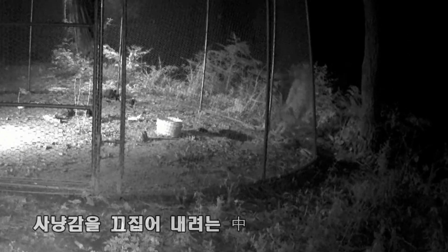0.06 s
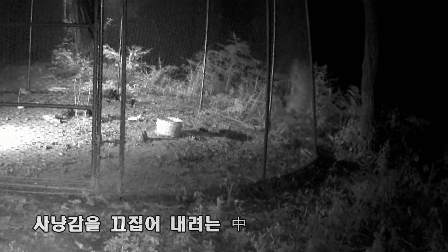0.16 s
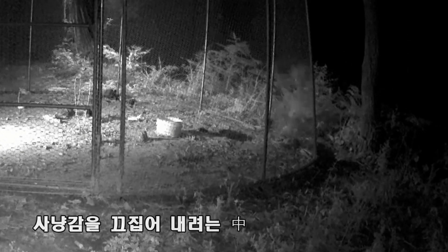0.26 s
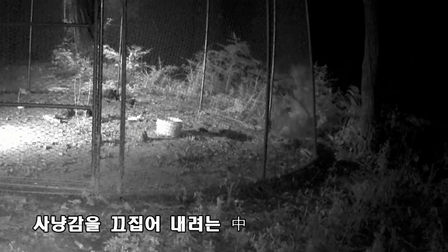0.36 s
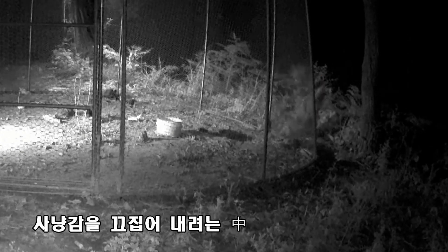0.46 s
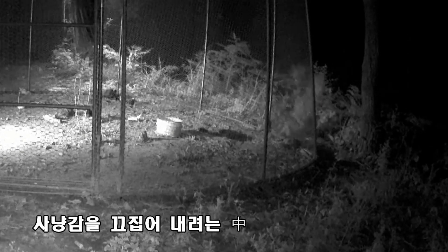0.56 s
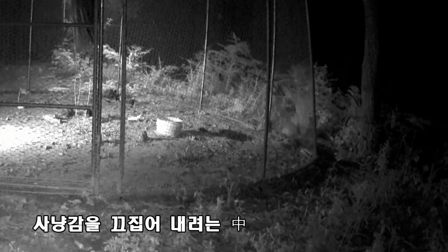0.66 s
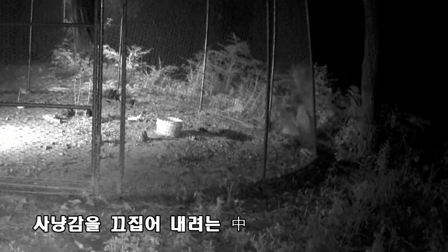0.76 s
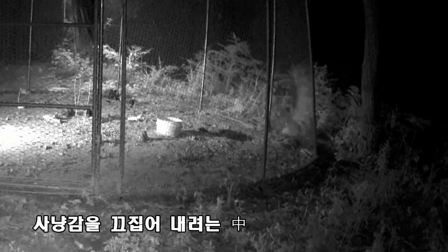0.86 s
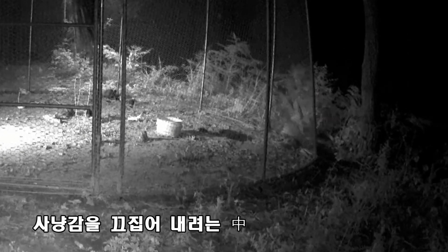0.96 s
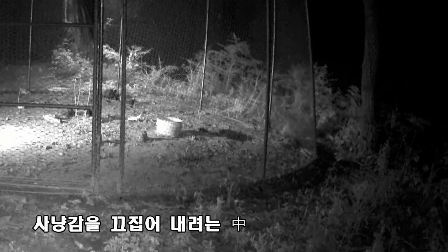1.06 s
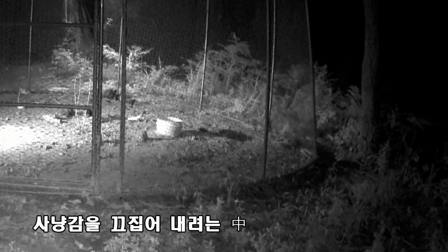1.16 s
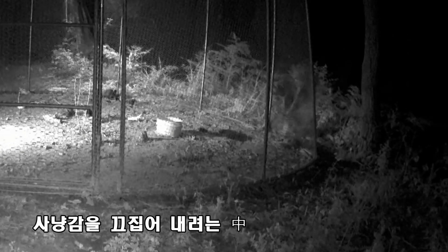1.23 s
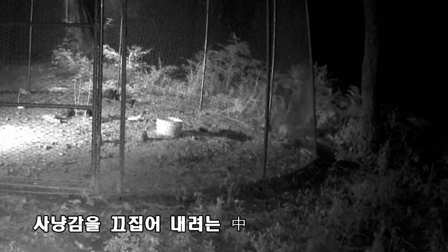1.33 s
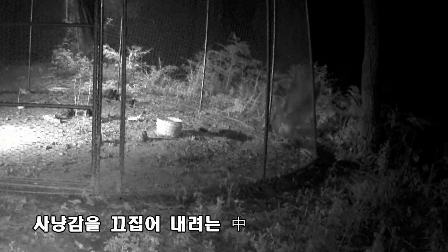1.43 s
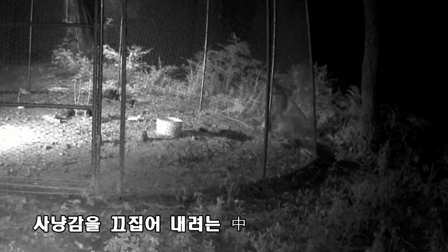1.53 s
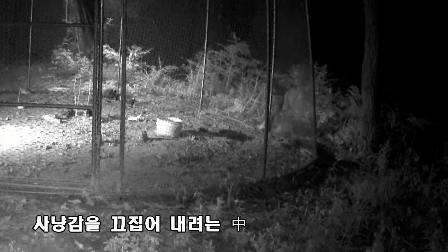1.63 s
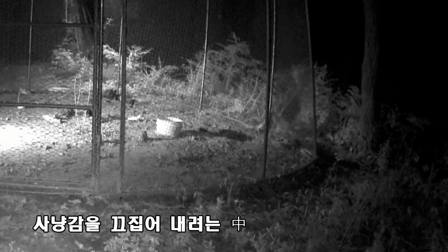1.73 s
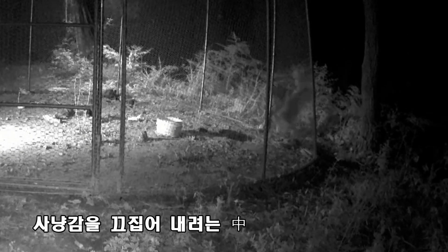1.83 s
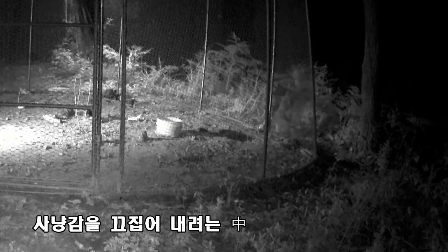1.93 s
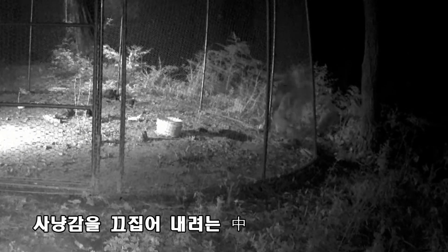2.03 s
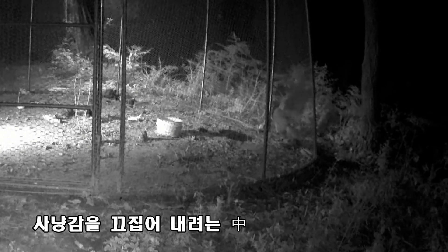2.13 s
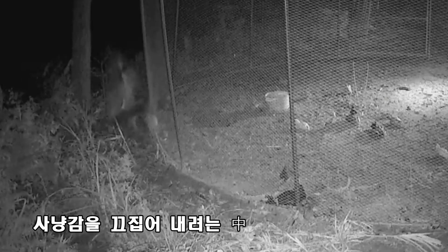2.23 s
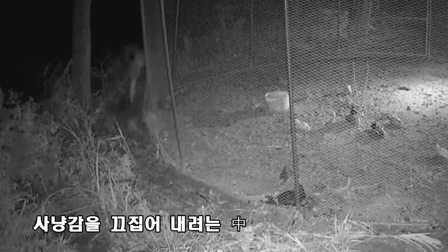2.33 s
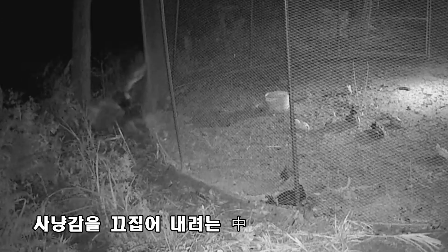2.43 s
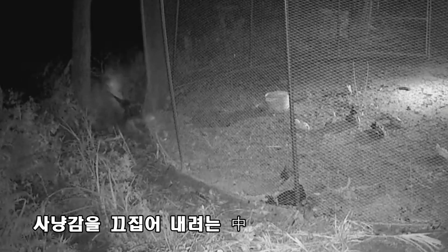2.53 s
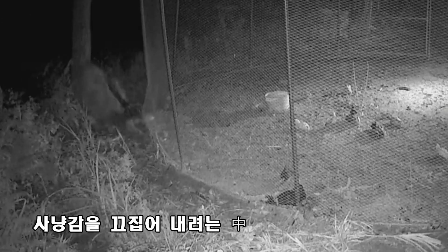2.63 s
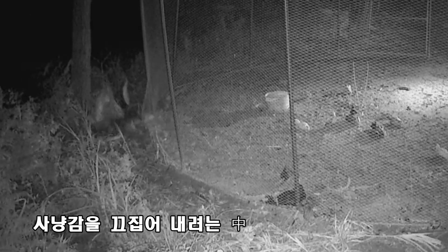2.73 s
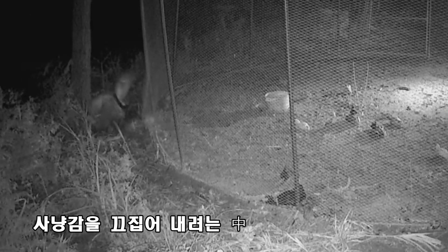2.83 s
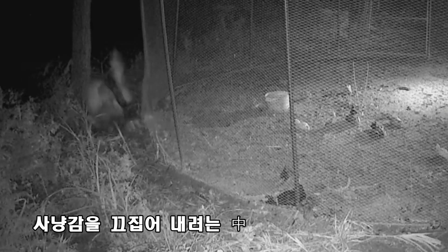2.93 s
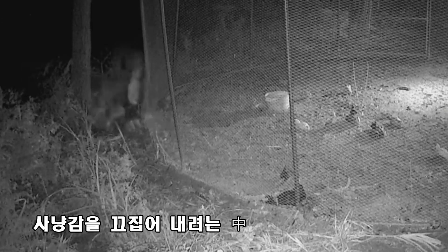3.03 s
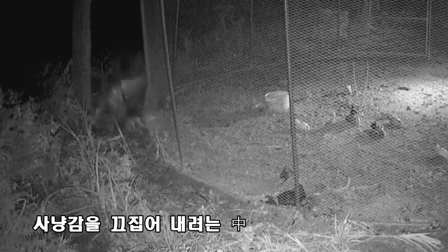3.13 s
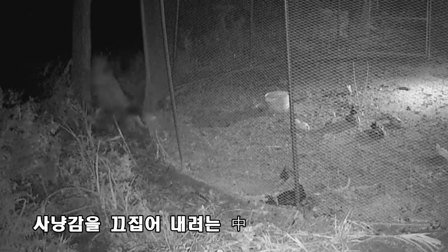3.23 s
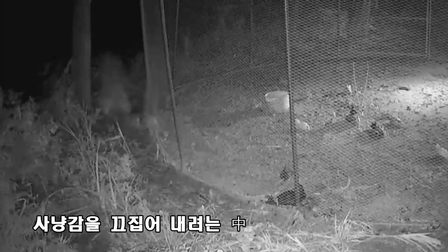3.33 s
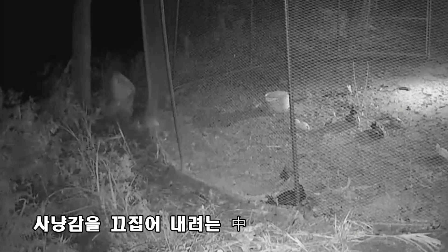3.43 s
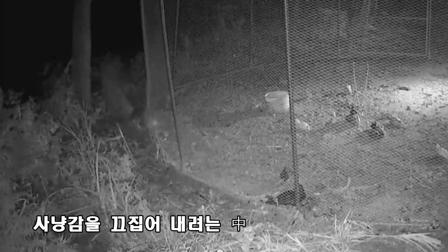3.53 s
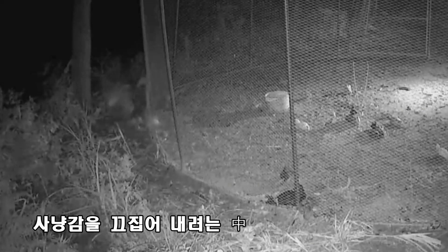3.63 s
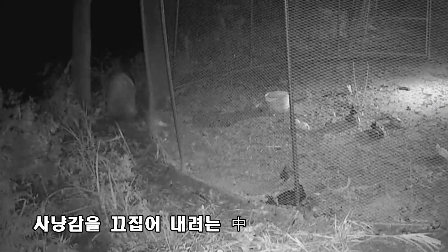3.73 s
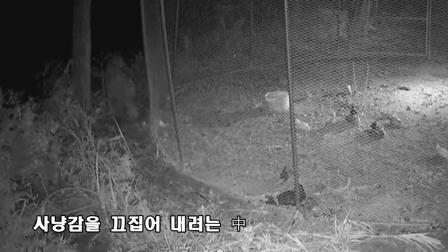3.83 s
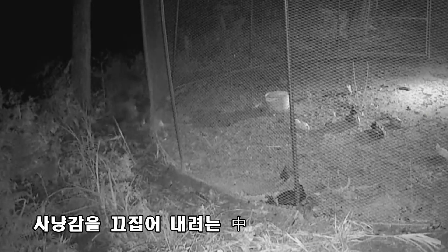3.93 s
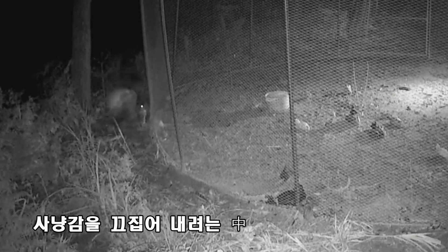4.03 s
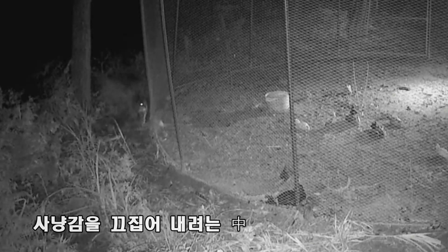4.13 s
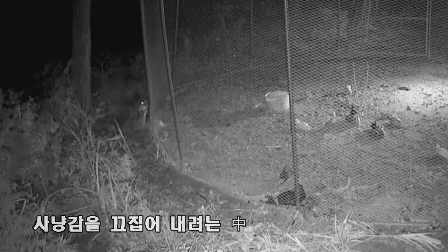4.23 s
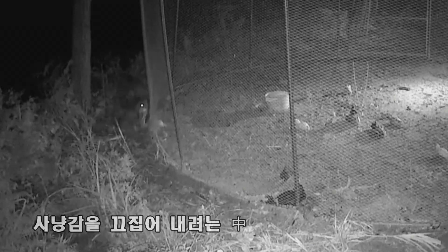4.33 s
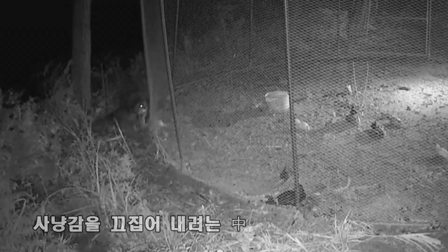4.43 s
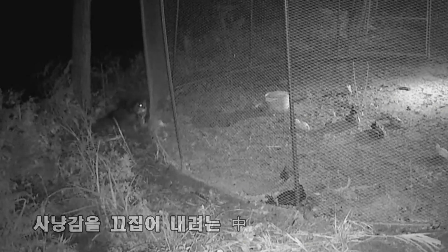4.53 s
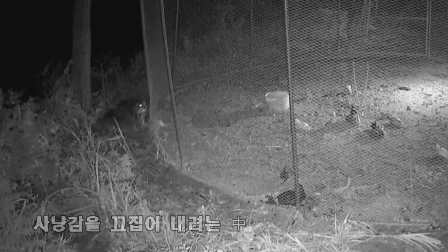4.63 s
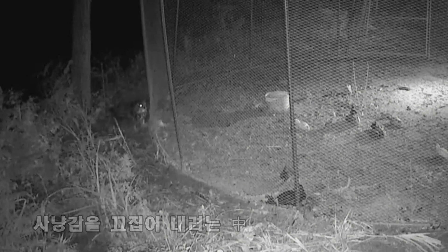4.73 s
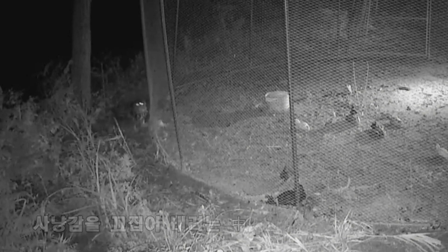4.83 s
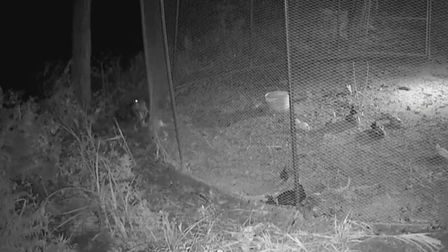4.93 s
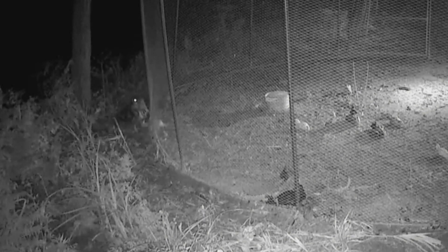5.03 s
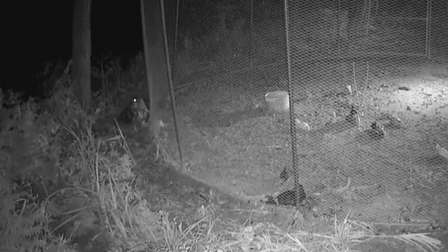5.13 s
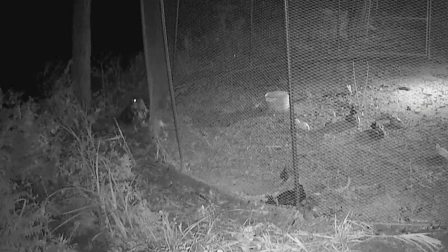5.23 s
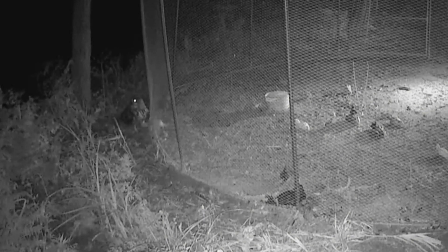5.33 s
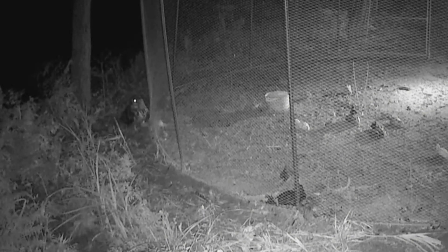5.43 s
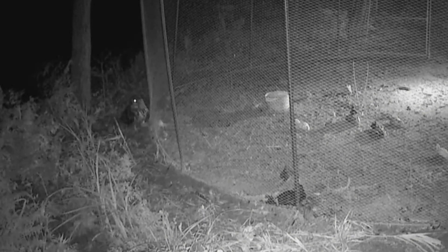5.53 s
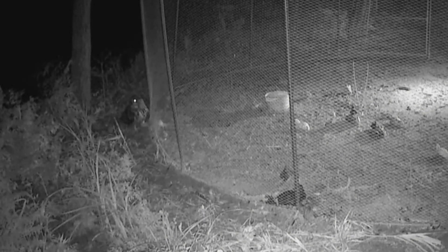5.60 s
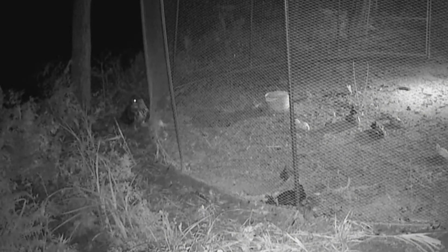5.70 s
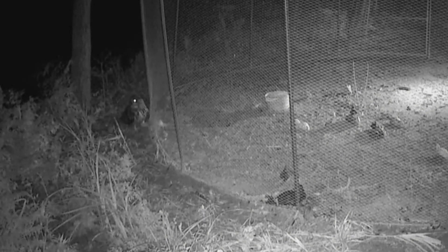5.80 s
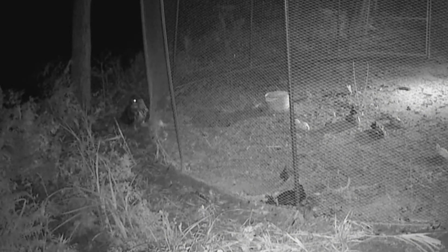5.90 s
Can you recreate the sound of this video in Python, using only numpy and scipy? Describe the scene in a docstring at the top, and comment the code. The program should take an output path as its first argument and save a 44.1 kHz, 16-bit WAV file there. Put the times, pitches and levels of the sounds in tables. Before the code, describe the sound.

Crickets trill at night while an animal twice rattles and thumps a wire fence, then a far dog yelps once.

```python
"""A wire-mesh fence clashes as an animal throws itself at a poultry pen at night. Each blow slams hundreds of
wire crossings together, the mesh shivers on, the posts boom and a taut wire squeals as it swings back. Three
kinds of cricket call with their wings over a faint rumble and insect hiss. The bout plays twice. Near the end a
far dog yelps once and trails off in a whine that rings in the woods, then a faint higher tone follows.
Everything sits in the left channel."""
import sys
import numpy as np
from scipy import signal
from scipy.fft import rfft, irfft
from scipy.io import wavfile

SR = 44100
rng = np.random.default_rng(int(sys.argv[2]) if len(sys.argv) > 2 else 0)


def to_wav(sig):
    """Store sig (one row per channel, or 1-D mono) as 16-bit WAV at the path in sys.argv[1].

    Samples outside -1..1 are clipped; the rate is SR.
    """
    pcm = np.clip(np.atleast_2d(sig), -1, 1) * 32767
    pcm = np.round(pcm).astype(np.int16)
    wavfile.write(sys.argv[1], SR, pcm.T)  # frames by channels


N = 262836
T = np.arange(N) / SR


def undb(db):
    """Decibels to gain."""
    return 10 ** (np.asarray(db) / 20)


def unit(x):
    """Scale to rms 1."""
    return x / np.sqrt(np.mean(x ** 2) + 1e-20)


def eq_db(eq, hz):
    """Level of an EQ curve at the given frequencies."""
    rows = np.array(eq)
    return np.interp(np.log(hz + 0.00091), np.log(rows[:, 0]), rows[:, 1])


def colour(x, eq):
    """Filter through an EQ curve; rms 1."""
    hz = np.arange(len(x) // 2 + 1) * SR / len(x)
    return unit(irfft(rfft(x) * undb(eq_db(eq, hz)), len(x)))


def noise(size, eq):
    """Coloured noise at rms 1."""
    return colour(rng.standard_normal(size), eq)


def drift(rate_hz):
    """Random modulator with a spread near 1."""
    knots = rng.standard_normal(4096)
    return 1.2 * np.interp(T * rate_hz, np.arange(len(knots)), knots)


def add(out, start, x):
    """Mix x in at a start time in seconds."""
    i = int(start * SR)
    out[i:i + len(x)] += x[:max(N - i, 0)]


def resonate(x, modes):
    """Parallel bank of two-pole resonators, each at least 15 Hz wide."""
    return sum(undb(db) * signal.lfilter(*signal.iirpeak(hz, hz / max(width, 15), SR), x)
               for hz, width, db in modes)


def woods(x, t60):
    """Reverb of sound scattered back by many trunks."""
    tail = rng.standard_normal(SR) * undb(-60 * T[:SR] / t60)
    return signal.fftconvolve(x, tail / np.linalg.norm(tail))[:N]


# ring of the short wire spans (frequency [Hz], width [Hz], level [dB])
SPAN_MODES = [(1440, 13, -7), (1800, 37, -15), (1970, 19, -10), (2194, 16, 4), (2630, 23, 0),
              (3210, 150, -7.5), (3820, 63, -6), (4070, 29, -10), (5200, 51, -10.5), (5080, 46, -6),
              (6370, 140, 3.5), (7010, 58, 5.5)]


def wire_contacts(size, spread_db, ring_db):
    """Dense clicks of very unequal strength, each ringing the spans of the mesh."""
    clicks = rng.standard_normal(size)
    clicks *= undb(spread_db * np.repeat(rng.standard_normal(size // 8 + 1), 8)[:size])
    return clicks + undb(ring_db) * resonate(clicks, SPAN_MODES)


# hits on the mesh (time [s], level [dB], attack [s], length [s], rattle [dB], belly [dB], tilt [dB/octave])
MESH_HITS = [(2.395, -28, 0.001, 0.016, -11.5, -27.5, 0), (2.644, -39, 0.0013, 0.002, -14, -17, 3.5),
             (2.701, -47.5, 0.013, .02, -17, -31, -2.5), (2.903, -23, 0.016, .021, -5, -19.5, 0),
             (3.204, -35, 0.012, 0.0082, -29, -10, 2.5), (3.258, -24.3, 0.018, .031, -6, -21, 0.5),
             (3.602, -24, 0.015, 0.026, -11, -20.5, -0.64), (3.759, -44, 0.017, .028, 0.5, -1, -2.5),
             (3.856, -35.5, .0016, 0.0047, -6, -17, 3), (4.054, -45.5, .006, 0.026, -18, -24, 7.5),
             (4.126, -38, 0.0018, 0.017, -8, -14.5, -0.4), (4.237, -44, 0.011, 0.054, -15, -23, 4.5)]
# bright crash of the crossings (frequency [Hz], level [dB])
CLASH_EQ = [(290, -36.5), (500, -17), (659, -13.5), (831, -2), (1060, -3.5), (1160, -1), (1380, -2),
            (1740, -1.5), (2810, -2.5), (4150, -0.5), (11500, -6.5), (14700, -19), (16000, -29)]
# the panel's own ring (frequency [Hz], width [Hz], level [dB])
PANEL_MODES = [(1516, 210, -5.5), (1783, 230, -0.5), (1970, 130, -3), (2410, 190, -10)]
# low body of the slack sheet (frequency [Hz], level [dB])
BELLY_EQ = [(60, -21), (150, -9), (250, -3), (450, 3.5), (580, 1), (720, -30), (1200, -44)]


def blows(stop_t60=0.049, rattle_t60=0.29, belly_lag_s=0.00847):
    """The crossings clash under the push, then rattle out; slow bending waves bring the lows late."""
    out, t = np.zeros(N), np.arange(16384) / SR
    for start, db, attack, length, rattle_db, belly_db, tilt in MESH_HITS:
        since_push = np.maximum(t - length, 0)
        push = np.minimum(0.28 + t / attack, 1) * undb(-60 * since_push / stop_t60)
        rattle = np.minimum(t / length, 1) * undb(rattle_db - 60 * since_push / rattle_t60)
        force = undb(db) * np.maximum(push, rattle)
        tilted_eq = [(hz, level + tilt * np.log2(hz / 4000)) for hz, level in CLASH_EQ]
        clash = colour(wire_contacts(len(t), spread_db=3, ring_db=-11), tilted_eq)
        clang_db = -8.5 - 2 * tilt  # square, dull blows ring the panel; glancing, bright ones hardly do
        clang = undb(clang_db) * unit(resonate(rng.standard_normal(len(t)), PANEL_MODES))
        add(out, start, force * unit(clash + clang))
        add(out, start + belly_lag_s, undb(belly_db) * force * noise(len(t), BELLY_EQ))
    return out


def sway(crest, build, t60, linger_db=-13, linger_t60=2.7):
    """Envelope of one sway: it builds to a crest, settles and leaves the fence trembling faintly."""
    before, after = np.maximum(crest - T, 0), np.maximum(T - crest, 0)
    settle = np.maximum(undb(-60 * after / t60), undb(linger_db - 60 * after / linger_t60))
    return np.exp(-(before / build) ** 2) * settle


# swings of the mesh (crest time [s], level [dB], build-up [s], t60 [s], chatter against jingle [dB])
MESH_SWAYS = [(2.45, -47.5, 0.022, 0.75, -5.5), (2.632, -45.5, 0.15, 0.64, -1.5),
              (3.27, -50, 0.082, 1.86, -2.5), (3.61, -49, .16, 3.2, -10), (3.885, -49, 0.077, 0.62, -4.5),
              (4.16, -50, 0.13, 1.29, -15), (4.31, -52, 0.057, 0.94, -10)]
# fine, sparkling contacts (frequency [Hz], level [dB])
JINGLE_EQ = [(1000, -9.5), (2500, -8.5), (4300, 0.5), (6500, -2.5), (9000, 2.5), (12000, -3), (16000, -19)]
# coarse, midrange contacts (frequency [Hz], level [dB])
CHATTER_EQ = [(80, -21), (200, -4.5), (450, -9), (700, -16.5), (1050, -2), (1500, -1), (2000, -3),
              (2700, -3), (3600, -4.5), (7000, -13.5)]


def shiver():
    """The swaying mesh keeps jingling and chattering in small flurries; the sways add in power."""
    jingle_power, chatter_power = np.zeros(N), np.zeros(N)
    for crest, db, build, t60, chatter_db in MESH_SWAYS:
        motion = undb(db) * sway(crest, build, t60)
        jingle_power += motion ** 2
        chatter_power += (undb(chatter_db) * motion) ** 2
    flurry = undb(1.78 * drift(70))
    jingle = colour(wire_contacts(N, spread_db=2, ring_db=-8), JINGLE_EQ) * np.sqrt(jingle_power)
    chatter = colour(wire_contacts(N, spread_db=2.5, ring_db=3), CHATTER_EQ) * np.sqrt(chatter_power)
    return flurry * (jingle + chatter) * (T > MESH_HITS[0][0])


# distant rumble (frequency [Hz], level [dB])
RUMBLE_EQ = [(25, -9), (42, -2), (62, -13), (100, 4.5), (125, -7), (165, -16.5), (340, -6.5), (480, -16.5),
             (570, -10), (660, -17.5), (1020, -12), (2400, -28.5), (4200, -20), (7500, -24.5)]
# airy hiss of far insects (frequency [Hz], level [dB])
INSECT_EQ = [(5000, -15), (7500, -4.5), (11000, -8), (14000, -2), (16000, -13)]


def night(rumble_db=-68, hiss_db=-66.5):
    """A bed of faint distant rumble and far insects."""
    rumble = undb(rumble_db + 0.17 * drift(5.2)) * noise(N, RUMBLE_EQ)
    return rumble + undb(hiss_db) * noise(N, INSECT_EQ)


# tone of the trilling cricket's wing (frequency [Hz], level [dB])
TRILL_EQ = [(7000, -30), (8000, -12.5), (8500, -0.5), (8900, -4), (9450, -1), (10200, -6.5), (11500, -11.5),
            (15000, -30)]


def trilling_cricket(stroke_hz=28.1, crest_s=4.2, level_db=-60.5, depth_db=3.5):
    """An endless high trill, one swell for each wing stroke."""
    stroke = np.cos(2 * np.pi * stroke_hz * (T - crest_s))
    return undb(level_db + depth_db * stroke + 0.93 * drift(16)) * noise(N, TRILL_EQ)


# thuds on the frame (time [s], level [dB], push pitch [Hz], attack [s], share of the free t60 [ratio])
FRAME_HITS = [(2.642, -46.5, 288, 0.015, 0.43), (2.917, -49, 312, 0.055, 0.66),
              (3.748, -30.5, 267, 0.026, 0.94), (3.805, -37.5, 227, 0.014, 1),
              (3.859, -40, 190, 0.002, 0.37), (4.127, -36, 267, 0.045, 0.8)]
# boom of posts and frame (frequency [Hz], level [dB], free t60 [s])
FRAME_MODES = [(106.7, -10.5, 0.62), (124.2, -9, 0.54), (139.9, -7.5, 0.74), (212.4, -1, 0.32),
               (234, 0.5, 0.38), (264, -19, 0.62), (334.2, 1, 0.29), (364, -10.5, 0.48),
               (396.6, -10.5, 0.42), (462, -7, 0.2), (477, -16, 0.083), (550, -11, 0.32), (952, 3.5, 0.3),
               (1002, 1.5, 0.29), (1006, -33, 0.16), (1193, 2.5, 0.47)]


def frame_booms(focus_db=5, low_lag=1.48, sag=0.039, sag_s=0.055):
    """Thuds ring the modes near their pitch: lows build up last, and pitch sags as the tension eases."""
    out, t = np.zeros(N), np.arange(32768) / SR
    hz, mode_db, t60 = np.transpose(FRAME_MODES)[:, :, None]
    warped_t = t + sag * sag_s * (1 - np.exp(-t / sag_s))
    for start, db, push_hz, attack, share in FRAME_HITS:
        gain = undb(mode_db - focus_db * np.log2(hz / push_hz) ** 2)
        build = np.minimum(t / (attack * np.maximum(push_hz / hz, 1) ** low_lag), 1)
        decay = undb(-60 * t / (t60 * share))
        rings = build * decay * np.sin(2 * np.pi * (hz * warped_t + rng.random(hz.shape)))
        add(out, start, 2 * undb(db) * np.sum(gain * rings, axis=0) / np.linalg.norm(gain))
    return out


# bush cricket's buzzes (centre time [s], level [dB], half-length [s], tooth rate [Hz])
WING_BUZZES = [(2.885, -51.5, 0.045, 410), (3.213, -51, 0.041, 460), (3.603, -47, 0.039, 410),
               (4.019, -50, 0.056, 297), (4.801, -52.5, 0.07, 360), (5.025, -54.5, 0.075, 410),
               (5.525, -53.5, 0.076, 400), (5.755, -55, 0.058, 316), (5.912, -54.5, 0.067, 420)]
# tone of its wing (frequency [Hz], level [dB])
BUZZ_EQ = [(8500, -18), (9800, -8.5), (10250, 5), (10650, -3.5), (11300, -1), (12000, -8), (13500, -19.5)]


def bush_cricket(rasp_db=-4, hang_db=-16, hang_s=0.058):
    """Rapid tooth strikes ring the wing in short buzzes that hang in the trees."""
    out, t = np.zeros(N), np.arange(-8192, 16384) / SR
    for centre, db, half_length, tooth_hz in WING_BUZZES:
        harmonics = sum(undb(eq_db(BUZZ_EQ, hz)) * np.sin(2 * np.pi * (hz * t + rng.random()))
                        for hz in tooth_hz * np.arange(25, 35))
        wing = unit(harmonics) + undb(rasp_db) * noise(len(t), BUZZ_EQ)
        swell = np.exp(-2 * (t / half_length) ** 2)
        hang = undb(hang_db) * np.exp(-abs(t - half_length) / hang_s)
        add(out, centre + t[0], undb(db) * (swell + hang) * unit(wing))
    return out


# hollow knocks (centre time [s], level [dB], pitch [Hz], half-length [s], rise [octaves/s])
SHEET_KNOCKS = [(2.41, -43.5, 800, 0.011, 0.5), (2.928, -42.5, 501, 0.0087, 3.5),
                (3.207, -40.5, 351, 0.0053, 1), (3.283, -33, 428, 0.0057, 12.5),
                (3.63, -48, 577.5, 0.018, 0)]


def knocks():
    """The whole sheet snaps taut and rings for a few cycles, rising in pitch as it tightens."""
    out, t = np.zeros(N), np.arange(-2048, 2048) / SR
    for centre, db, hz, half_length, rise in SHEET_KNOCKS:
        cycles = np.cumsum(hz * 2 ** (rise * t)) / SR + rng.random()
        envelope = np.sqrt(2) * undb(db) * np.exp(-(t / half_length) ** 2)
        add(out, centre + t[0], envelope * np.sin(2 * np.pi * cycles))
    return out


# chirp phrases (time [s], syllable rate [Hz], length [s], level [dB], pitch [Hz], syllable's fall [ratio])
CHIRP_PHRASES = [(3.037, 15.5, .45, -57, 4030, .08), (4.46, 23.8, .42, -66, 4040, .11),
                 (4.955, 23.5, .127, -67, 4020, .11), (5.136, 24, .166, -68, 3990, .12),
                 (5.422, 15, .133, -65, 3800, .21), (5.555, 14.9, .4, -62, 3840, .21)]


def field_cricket(duty=0.72, trim_db=-6.5, woods_db=-3, rough_db=4):
    """Nearly pure syllables that fall in pitch as the wing slows, blurred by the undergrowth."""
    chirps = np.zeros(N)
    for start, rate, length, db, hz, fall in CHIRP_PHRASES:
        stroke = np.minimum(T[:int(length * SR)] * rate % 1 / duty, 1)
        pitch = hz * (1 + fall * (0.5 - stroke))
        add(chirps, start, undb(db) * np.sin(np.pi * stroke) * np.sin(2 * np.pi * np.cumsum(pitch) / SR))
    song = chirps * undb(trim_db + rough_db * drift(400) + drift(7.3))
    return song + undb(woods_db) * woods(song, t60=0.15)


# a taut wire scraping through its tie (time [s], level [dB], t60 [s])
WIRE_SCRAPES = [(3.743, -42.5, 0.37), (4.058, -50.5, 0.67), (4.118, -39.5, 0.17), (4.149, -47.5, 0.55)]
# ring of that wire (frequency [Hz], width [Hz], level [dB])
TAUT_MODES = [(4230, 35, -0.5), (4450, 23, -6), (4402, 16, -1.5), (5330, 280, -11.5), (6020, 21, -12),
              (7900, 34, -16)]


def wire_squeals(squeal_hz=4275, slip_hz=55, rasp_db=2, ping_hz=11950, ping_db=-6, ping_t60=0.22):
    """A taut wire lets go with a bright ping, then sticks and slips in a wavering squeal."""
    force, ping, t = np.zeros(N), np.zeros(N), T[:SR]
    for start, db, t60 in WIRE_SCRAPES:
        onset = undb(db) * np.minimum(t / 0.0051, 1)
        add(force, start, onset * undb(-60 * t / t60))
        add(ping, start, onset * undb(ping_db - 60 * t / ping_t60))
    slip_rate = slip_hz * (1 + 0.23 * drift(30))
    slips = 1 + 0.2 * np.sin(2 * np.pi * np.cumsum(slip_rate) / SR)
    phase_per_hz = 2 * np.pi * np.cumsum(1 + 0.015 * drift(160)) / SR  # the tension trembles
    rasp = undb(rasp_db) * unit(resonate(rng.standard_normal(N), TAUT_MODES))
    squeal = unit(np.sqrt(2) * np.sin(squeal_hz * phase_per_hz) + rasp)
    return force * slips * squeal + ping * np.sin(ping_hz * phase_per_hz)


# the yelp, its trailing whine, then a faint higher tone (time [s], target pitch [Hz], level [dB], attack [s],
# t60 [s])
DOG_NOTES = [(4.732, 403, -35, 0.018, 0.21), (4.808, 386, -51, 0.0313, .36), (5.03, 578, -69.5, 0.047, 1.1)]
# formants of the dog's throat (frequency [Hz], level [dB])
THROAT_EQ = [(90, -31), (220, 15), (390, -4.5), (790, -6), (1190, -19), (1590, -18.5), (2000, -30),
             (2400, -28.5), (2800, -37), (3500, -39), (9000, -70)]


def dog(scoop=0.38, scoop_s=0.0065, sag_hz_per_db=2.1, chest_s=0.007, chest_fade_s=0.027, woods_db=-16):
    """A far yelp, its trailing whine and a faint higher tone: each scoops up, then sags as it fades."""
    yelp, t = np.zeros(N), T[:SR]
    for start, top_hz, db, attack, t60 in DOG_NOTES:
        fade_db = -60 * np.clip((t - attack) / t60, 0, 1)
        pitch = top_hz * (1 - scoop * np.exp(-t / scoop_s)) + sag_hz_per_db * fade_db
        pitch *= 1 + 0.0056 * drift(296)[:SR]
        phase = 2 * np.pi * np.cumsum(pitch) / SR
        voice = sum(undb(eq_db(THROAT_EQ, k * pitch) - eq_db(THROAT_EQ, top_hz)) * np.sin(k * phase)
                    for k in range(1, 10))
        breath = undb(-17) * noise(SR, THROAT_EQ)
        envelope = np.minimum(t / attack, 1) * undb(db + fade_db) * (t < attack + t60)
        add(yelp, start, envelope * (voice + breath))
    # the chest sounds only in the first push; all that follows is thin
    thin = undb(2) * signal.sosfiltfilt(signal.butter(2, 450, "high", fs=SR, output="sos"), yelp)
    chest = np.clip(1 - (T - DOG_NOTES[0][0] - chest_s) / chest_fade_s, 0, 1)
    return chest * yelp + (1 - chest) * thin + undb(woods_db) * woods(thin, t60=0.7)


def scene(repeat_s=2.46912, early_db=-2, lull_db=-6):
    """A softer early pass of the bout crossfades through a short lull into the full one, hard left."""
    fence = blows() + shiver() + knocks() + frame_booms() + wire_squeals()
    bout = fence + trilling_cricket() + bush_cricket() + field_cricket() + night()
    early = np.roll(bout, -int(repeat_s * SR)) * undb(early_db)
    crossfade = np.clip((T - 2.2) / 0.15, 0, 1)
    lull = undb(np.interp(T, [2.3, 2.42], [lull_db, 0]))
    mono = np.sqrt(1 - crossfade) * early + np.sqrt(crossfade) * lull * bout + dog()
    return np.array([2 * mono, np.zeros(N)])


def record(dry, top_hz=15850):
    """A steep low-pass shaves off the highest treble."""
    return signal.sosfilt(signal.ellip(10, 0.2, 80, top_hz, fs=SR, output="sos"), dry)


dry = scene()
out = record(dry)
to_wav(out)
```